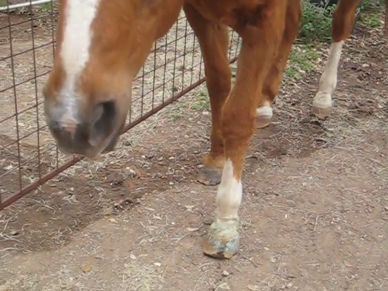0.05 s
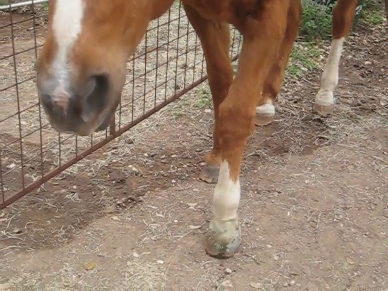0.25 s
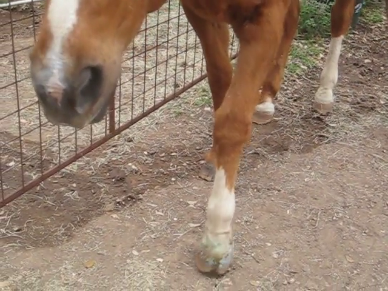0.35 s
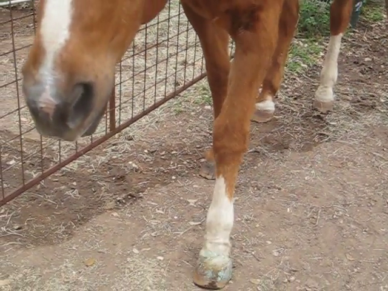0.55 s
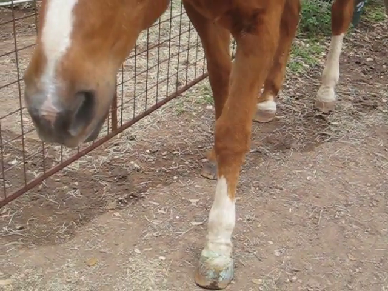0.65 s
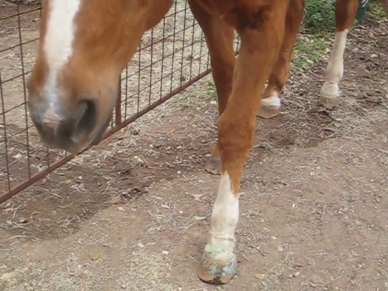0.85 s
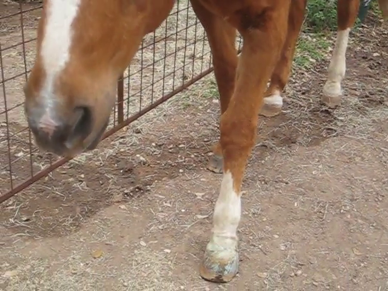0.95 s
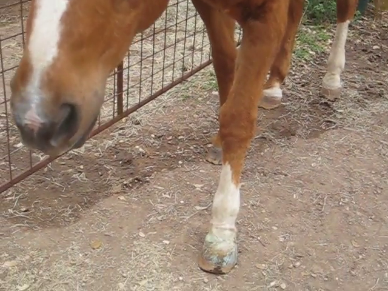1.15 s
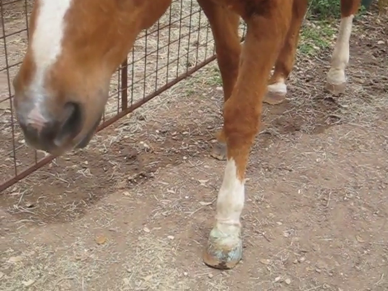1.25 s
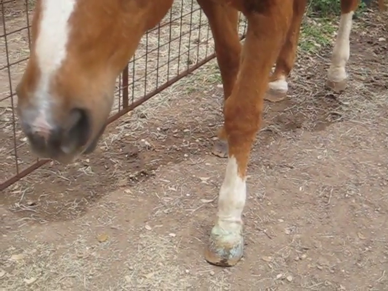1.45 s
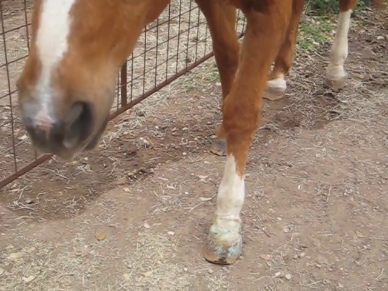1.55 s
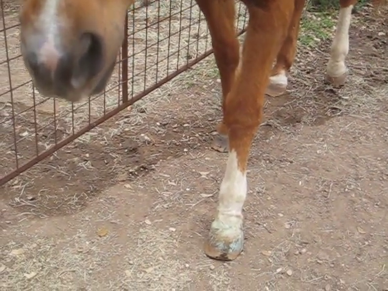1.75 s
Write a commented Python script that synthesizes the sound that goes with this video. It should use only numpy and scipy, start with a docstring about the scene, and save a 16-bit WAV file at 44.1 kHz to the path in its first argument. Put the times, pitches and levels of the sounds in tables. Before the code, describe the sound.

A horse's hoof knocks once on hard ground at about 0.2 seconds, a sharp, dry clack and the loudest sound. At around 0.5 seconds it lands more softly, with a light thud and a short crunch of grit that fades by 0.7 seconds. Tiny pebble ticks follow near 0.9 and 1.2 seconds. Quiet outdoor air and hiss run steadily throughout.

```python
"""A hoof on hard ground and gravel

A horse knocks a hoof once against hard ground, then sets it down on gravelly dirt. The knock is
a quick cluster of impacts that excite the damped modes of the horn; the landing is a soft thud
with crunching grit that settles under the weight. Nearby ground and the yard return faint
reflections, over quiet outdoor air, microphone hiss and thin steady tones."""
import sys
import numpy as np
from scipy import signal
from scipy.fft import rfft, irfft
from scipy.io import wavfile

SR = 44100
rng = np.random.default_rng(int(sys.argv[2]) if len(sys.argv) > 2 else 0)


def dump(signal):
    """Clip the signal to [-1, 1] and save it as 16-bit WAV at the path in sys.argv[1]."""
    limited = np.clip(np.atleast_2d(signal).T, -1, 1)
    pcm = np.round(limited * 32767).astype(np.int16)
    wavfile.write(sys.argv[1], SR, pcm)


N = 79380
T = np.arange(N) / SR

# contacts of the hoof's rim within the knock: start_s, level_db
RIM_CONTACTS = [(.2167, -27), (.2183, -12.5), (.2199, -2.5), (.2213, -8), (.2245, -28)]
# spectrum of the dead clack of horn on hard ground: frequency_hz, gain_db
CLACK_SPECTRUM = [(60, -54), (250, -40), (500, -24.5), (1000, -14), (1300, -6.5), (1700, -1), (2150, -1),
                  (2450, -4.5), (2850, -19.5), (3700, -19), (4300, -38.5), (5800, -42), (8000, -54),
                  (16000, -52)]
# modes of the horn: pitch_hz, gain_db, t60_s
HORN_MODES = [(397, -20.5, 0.068), (630, -35.5, .035), (814, -33, 0.044), (1310, -21.5, 0.024),
              (1467, -26, 0.026), (2120, -43, 0.018), (2980, -41, 0.017), (3660, -38.5, 0.018),
              (4680, -48, .02)]
# weight arriving on the soil: start_s, level_db
SOIL_THUDS = [(0.222, -46.5), (0.455, -50), (0.475, -44.5), (0.504, -50), (.572, -49)]
# spectrum of the thudding soil: frequency_hz, gain_db
SOIL_SPECTRUM = [(30, -13), (75, 0), (140, 2.5), (230, -12), (400, -16), (1500, -57)]
# the sole slapping down: start_s, level_db
SOLE_SLAPS = [(.4565, -41), (.4642, -34.5), (.4664, -23.5), (.4681, -45)]
# modes of the sole: pitch_hz, gain_db, t60_s
SOLE_MODES = [(962, -13, 0.048), (1480, -7, 0.012), (2104, -7.5, 0.037), (2680, -8.5, 0.021),
              (3280, -18, 0.011)]
# modes of the air trapped under the hollow of the sole: pitch_hz, gain_db, t60_s
CAVITY_MODES = [(367, -29, 0.05), (485, -29.5, .065)]
# pushes that crush the grit: start_s, level_db, rise_s, fade_s
GRIT_PUSHES = [(0.2203, -33, 0.0014, 0.0047), (0.455, -36, 0.0018, 0.01), (.464, -37.5, 0.0025, 0.0093),
               (0.489, -48.5, 0.0037, .02), (.502, -43.5, 0.011, .006), (.564, -47, 0.0059, 0.0099),
               (.582, -53, .003, 0.11)]
# spectrum of one grain's click: frequency_hz, gain_db
GRAIN_SPECTRUM = [(200, -20), (400, -2), (1000, 1), (2400, 2.5), (3500, -2.5), (5000, -8), (7000, -10),
                  (11000, -21), (16000, -31)]
# single pebbles snapping: start_s, level_db
PEBBLE_SNAPS = [(.4585, -31), (.493, -40), (.5062, -35), (.571, -36), (.913, -42), (1.232, -42)]
# spectrum of one snap: frequency_hz, gain_db
PEBBLE_SPECTRUM = [(300, -18), (1500, -11), (3200, -7), (7000, -2), (12000, -10), (16000, -24)]
# colour of the reflections from nearby ground: frequency_hz, gain_db
GROUND_SPECTRUM = [(300, -6), (1300, -2), (2100, -9), (5000, -2)]
# colour of the yard's echo: frequency_hz, gain_db
YARD_SPECTRUM = [(300, -4), (1500, -9), (1900, -8), (2130, 0.5), (2450, -6), (6000, -2.5)]
# spectrum of the outdoor air: frequency_hz, gain_db
AIR_SPECTRUM = [(20, -6), (45, -4.5), (80, 2), (120, -3), (170, 1), (300, -1), (600, -2.5), (1200, -4),
                (2200, -5.5), (4000, -7), (7000, -11), (9600, -14.5)]
# microphone hiss, continuing that spectrum upward: frequency_hz, gain_db
HISS_SPECTRUM = [(9600, -15.5), (10300, -8.5), (11700, -15), (12600, -12), (13400, -5), (14300, -8.5),
                 (15000, -9), (16200, -17), (17200, -21)]
# faint hum and electronic whine: pitch_hz, rms_db
STEADY_TONES = [(117, -66.5), (7560, -71), (15121, -74), (15150, -66), (15734, -73)]


def knock():
    """Impact excitation: each rim contact gives a broadband clack and rings the modes of the horn."""
    return strikes(RIM_CONTACTS, click(CLACK_SPECTRUM)) + strikes(RIM_CONTACTS, ring(HORN_MODES))


def landing(cavity_start_s=0.456, cavity_rise_s=0.0084):
    """Impact and cavity resonance: the sole slaps, the soil thuds and the air between them rings."""
    slap = strikes(SOLE_SLAPS, ring(SOLE_MODES))
    weight = sum(amp(db) * swell(start_s, rise_s=0.0022, fade_s=0.017) for start_s, db in SOIL_THUDS)
    out = slap + weight * noise(SOIL_SPECTRUM)
    add(out, cavity_start_s, ring(CAVITY_MODES) * np.minimum(T / cavity_rise_s, 1))
    return out


def gravel(grains_per_s=5300, spread_db=3.5):
    """Shot noise: random grain clicks merge into a crunch that follows each push; a few pebbles snap."""
    sizes = amp(spread_db * np.minimum(rng.exponential(1, N), 3))
    signs = rng.choice([-1, 1], N)
    hits = rng.random(N) < grains_per_s / SR
    crunch = unit_rms(signal.fftconvolve(sizes * signs * hits, click(GRAIN_SPECTRUM))[:N])
    push = sum(amp(db) * swell(start_s, rise_s, fade_s) for start_s, db, rise_s, fade_s in GRIT_PUSHES)
    return push * crunch + strikes(PEBBLE_SNAPS, click(PEBBLE_SPECTRUM))


def reflections(source, spectrum, level_db, delay_s, t60_s):
    """Diffuse reflection: the source is convolved with a delayed, decaying tail of noise."""
    tail = noise(spectrum) * (T > delay_s) * decay(t60_s)
    return amp(level_db) * signal.fftconvolve(source, tail / np.linalg.norm(tail))[:N]


def background(air_db=-48.5, waver_rad=0.2, waver_hz=12):
    """Stationary noise of air and microphone lies under hum and whine with slight phase modulation."""
    air_and_hiss = amp(air_db) * noise(AIR_SPECTRUM + HISS_SPECTRUM)
    tones = np.zeros(N)
    for hz, rms_db in STEADY_TONES:
        phase = 2 * np.pi * hz * T + waver_rad * drift(waver_hz)
        tones += amp(rms_db) * np.sqrt(2) * np.sin(phase)
    return air_and_hiss + tones


def amp(db):
    """The decibel law: amplitude grows tenfold every 20 dB."""
    return 10 ** (np.asarray(db) / 20)


def unit_rms(x):
    """Normalisation to an rms of 1."""
    return x / np.sqrt(np.mean(x ** 2) + 1e-20)


def gain_at(spectrum, hz):
    """Interpolation of a spectrum on a log-frequency axis gives the amplitude gain."""
    frequency_hz, gain_db = np.transpose(spectrum)
    return amp(np.interp(np.log(hz + 1), np.log(frequency_hz), gain_db))


def noise(spectrum):
    """Spectral shaping gives white noise a colour, at rms 1."""
    white = rfft(rng.standard_normal(N))
    return unit_rms(irfft(white * gain_at(spectrum, np.fft.rfftfreq(N, 1 / SR)), N))


def drift(cutoff_hz):
    """Low-pass filtering turns noise into a slow random wander, at rms 1."""
    white = rfft(rng.standard_normal(N))
    return unit_rms(irfft(white / (1 + (np.fft.rfftfreq(N, 1 / SR) / cutoff_hz) ** 4), N))


def click(spectrum, size=4096):
    """Minimum phase packs a spectrum into a causal click, of peak 1."""
    log_gain = np.log(gain_at(spectrum, abs(np.fft.fftfreq(size, 1 / SR))))
    response = np.exp(np.conj(signal.hilbert(log_gain)))
    pulse = np.fft.ifft(response).real[:size // 2]
    return pulse / abs(pulse).max()


def decay(t60_s):
    """Exponential damping: the level falls 60 dB in t60_s."""
    return np.exp(-np.log(1000) * T / t60_s)


def ring(modes, cutoff_hz=300):
    """Modal vibration: a struck body sounds as damped sines and is too small to radiate bass."""
    sines = sum(amp(db) * decay(t60_s) * np.sin(2 * np.pi * hz * T) for hz, db, t60_s in modes)
    return signal.sosfilt(signal.butter(3, cutoff_hz, "high", fs=SR, output="sos"), sines)


def swell(start_s, rise_s, fade_s):
    """Loading and relaxation: a linear rise, then an exponential fall with time constant fade_s."""
    age_s = T - start_s
    return np.clip(age_s / rise_s, 0, 1) * np.exp(-np.maximum(age_s - rise_s, 0) / fade_s)


def add(mix, start_s, sound):
    """Superposition: a sound adds into the mix from its start time."""
    part = mix[round(start_s * SR):][:len(sound)]
    part += sound[:len(part)]


def strikes(events, sound):
    """Linear response: every strike gives the same sound, delayed and scaled."""
    out = np.zeros(N)
    for start_s, db in events:
        add(out, start_s, amp(db) * sound)
    return out


def scene():
    """Superposition of direct sound, reflections from ground and yard, and background, in mono."""
    hoof = knock() + landing() + gravel()
    ground = reflections(hoof, GROUND_SPECTRUM, level_db=-14, delay_s=0.0036, t60_s=0.035)
    yard = reflections(hoof, YARD_SPECTRUM, level_db=-25.5, delay_s=0.024, t60_s=0.31)
    return (hoof + ground + yard + background())[None]


def record(dry):
    """Band limiting: a linear-phase low-pass filter removes the highest treble."""
    cutoff_hz = 17200
    lowpass = signal.firwin(511, cutoff_hz, window=("kaiser", 9), fs=SR)
    return signal.oaconvolve(dry, lowpass[None], "same")


dry = scene()
out = record(dry)
dump(out)
```